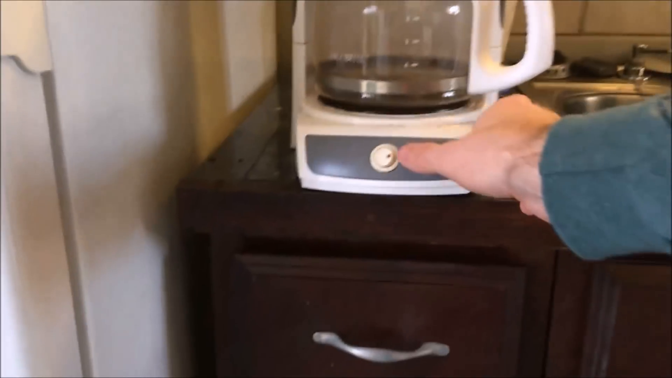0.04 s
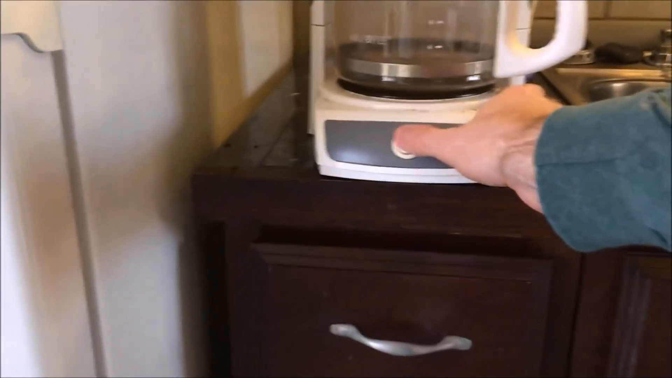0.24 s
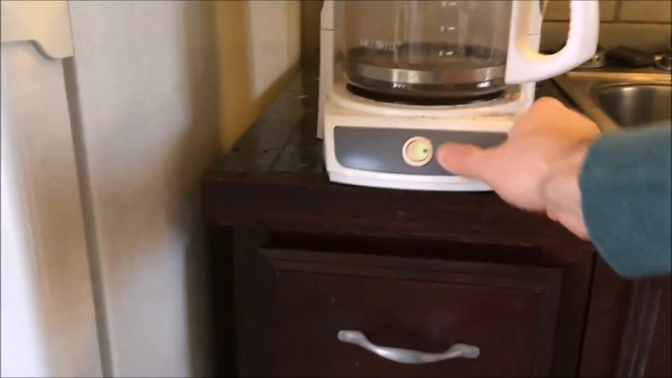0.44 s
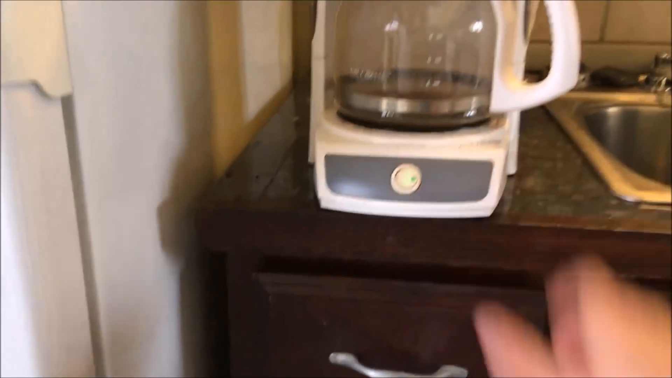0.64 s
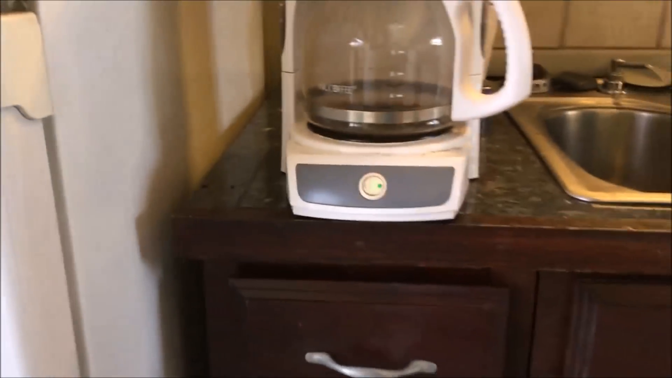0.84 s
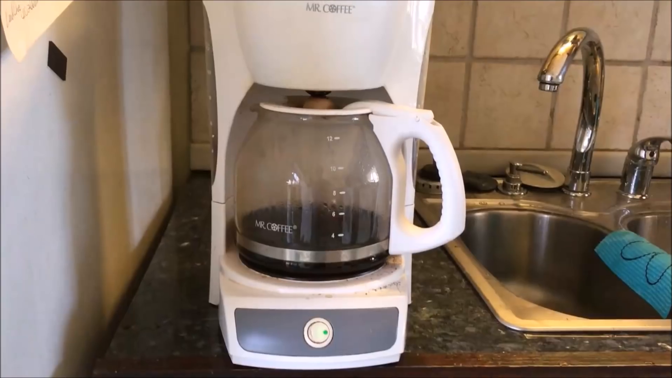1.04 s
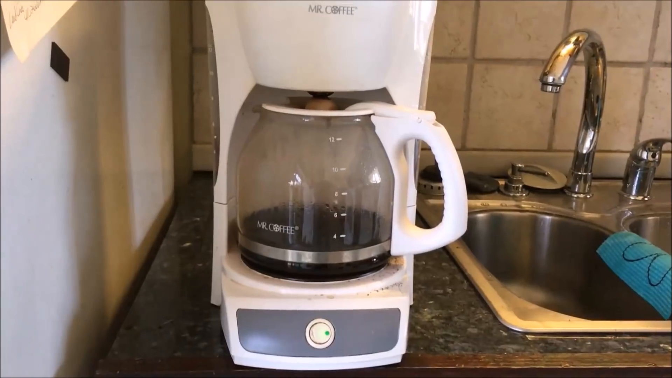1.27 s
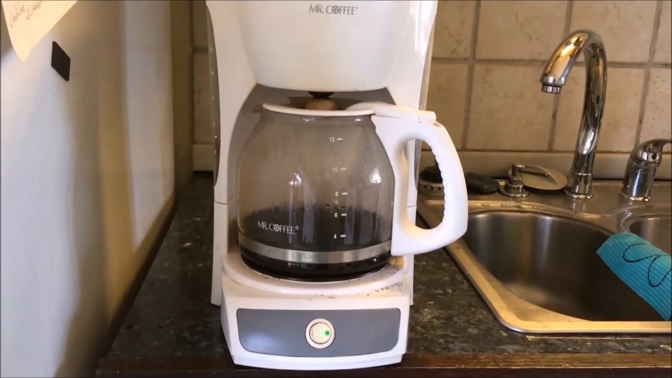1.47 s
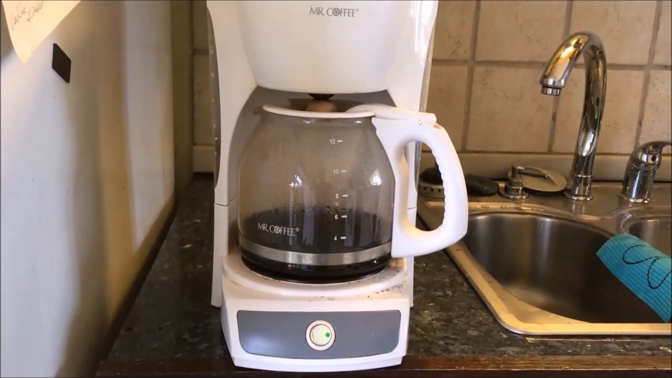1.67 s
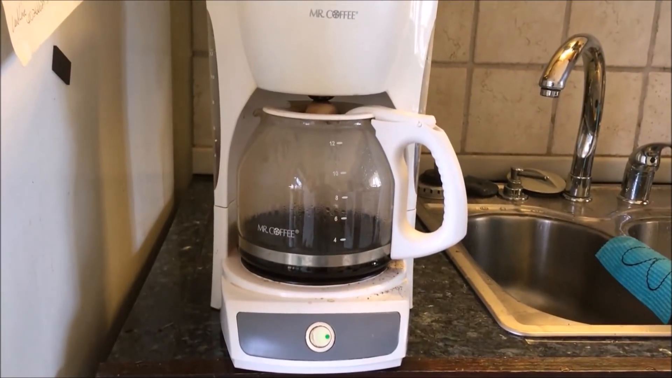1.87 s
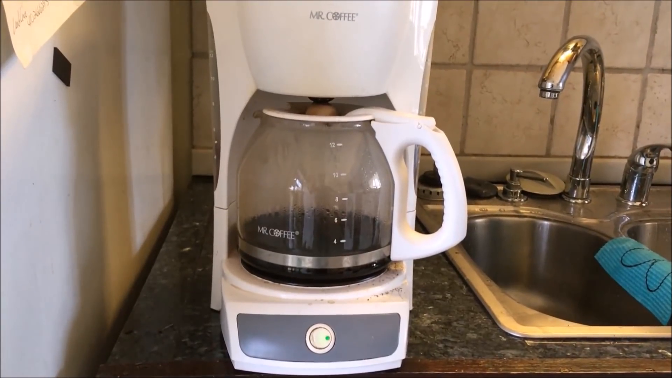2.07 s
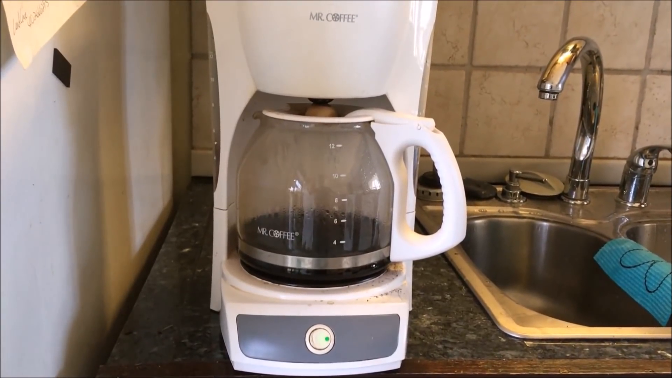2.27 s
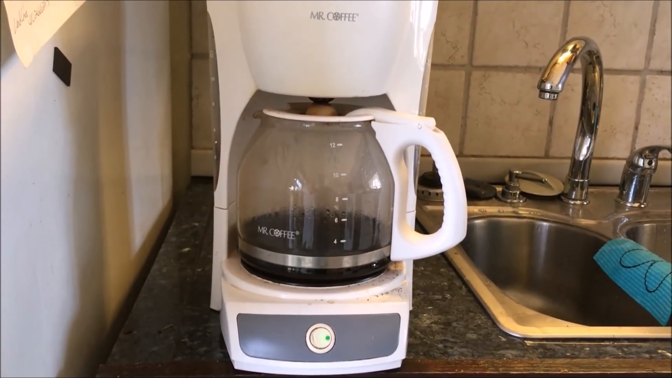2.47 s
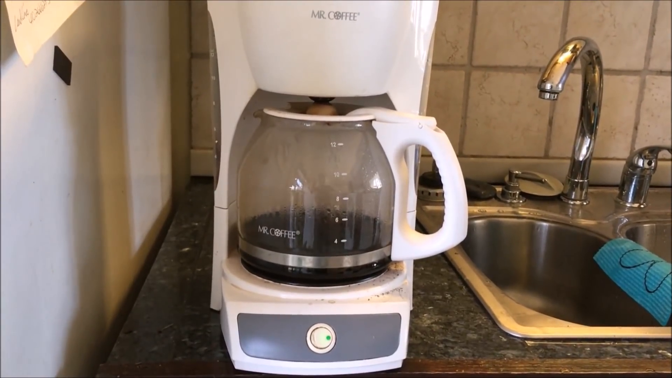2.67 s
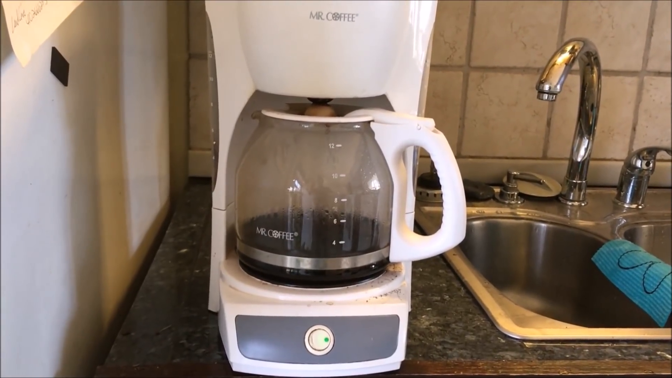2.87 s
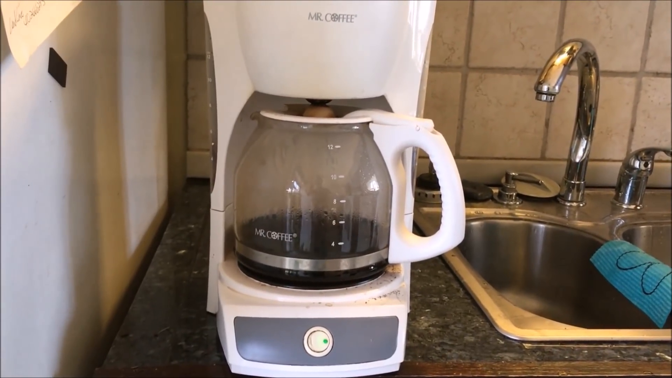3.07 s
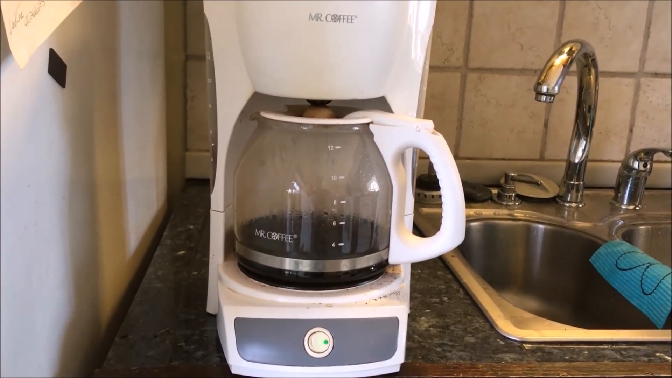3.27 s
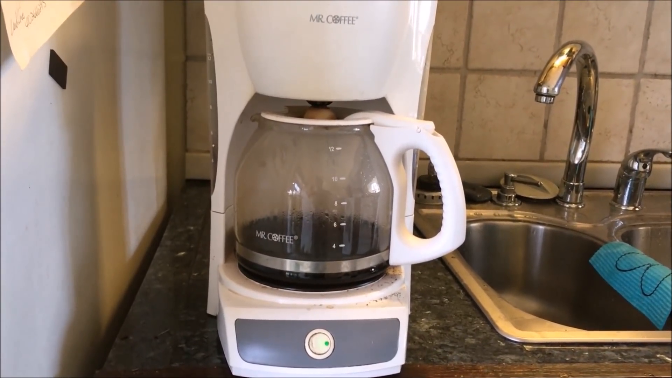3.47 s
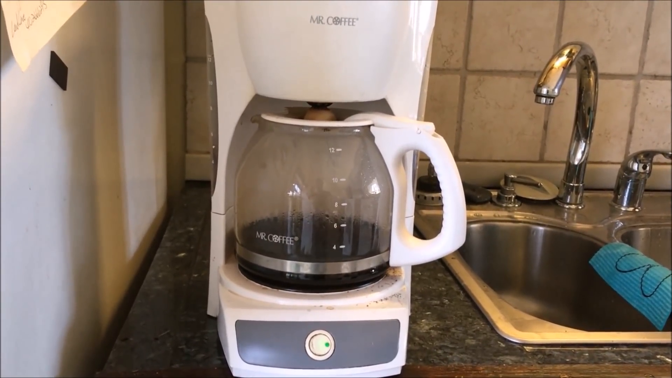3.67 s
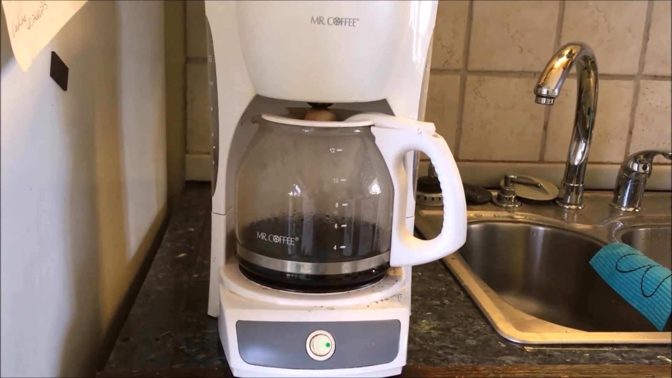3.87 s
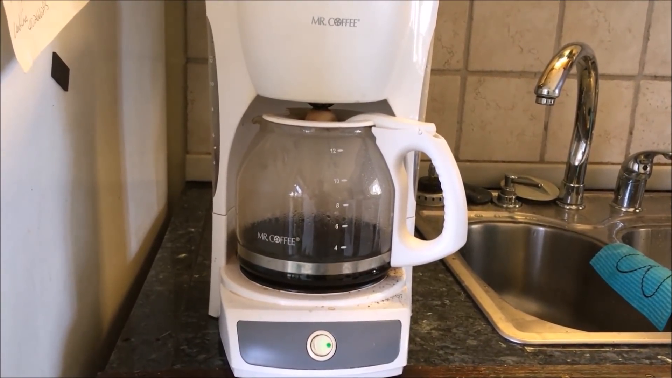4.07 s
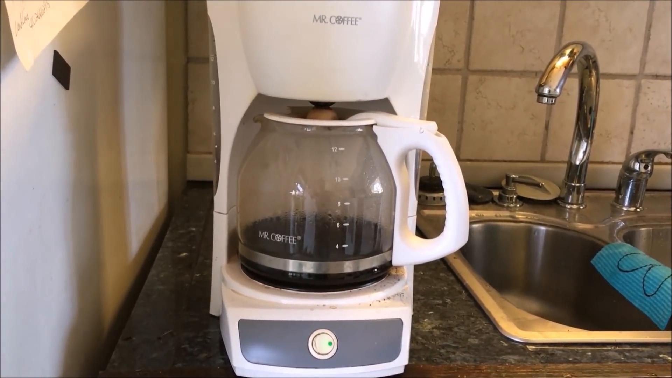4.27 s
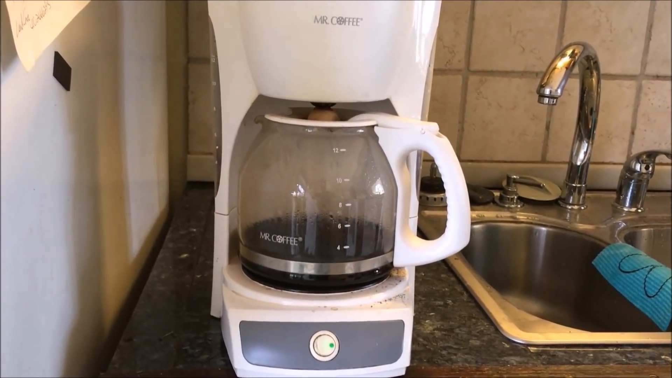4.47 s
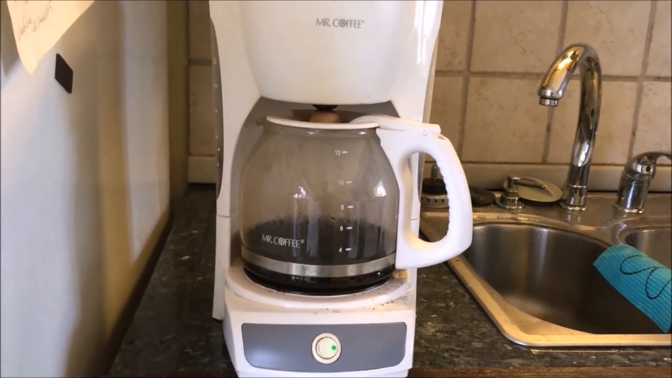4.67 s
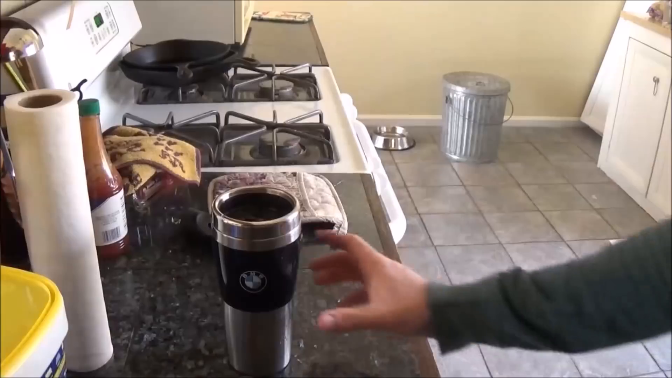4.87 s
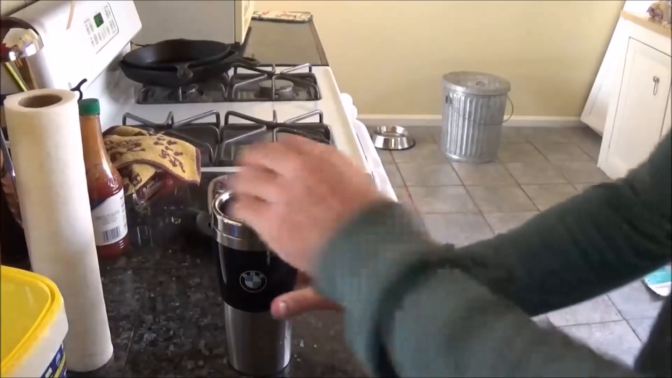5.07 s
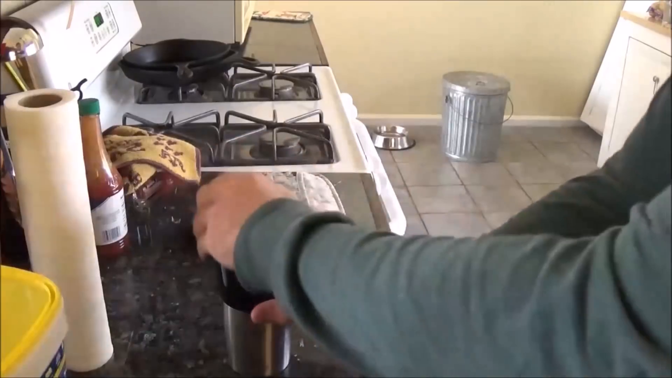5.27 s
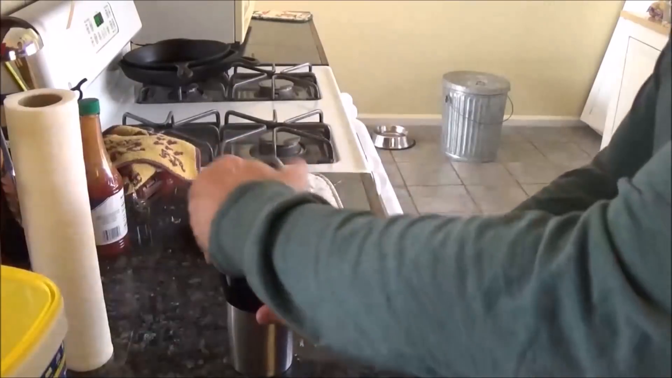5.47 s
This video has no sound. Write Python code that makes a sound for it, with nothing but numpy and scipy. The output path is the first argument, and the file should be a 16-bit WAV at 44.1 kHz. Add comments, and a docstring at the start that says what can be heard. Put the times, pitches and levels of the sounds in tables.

```python
"""A sleeve rustles in a quiet kitchen; a thumb lands on a drip coffee maker and snaps its switch.
The contacts rattle and ring the housing, and the machine rocks to rest in damped knocks.
It brews: steam slugs ring the riser tube, drops trap bubbles and ring the carafe, spits tick
and puffs hiss, over a simmer of small bubbles and fizz. The sound drops out briefly, returns
duller, and the brew has ended: cloth brushes past and a mug lid scrapes, both as dense clicks."""
import sys
import numpy as np
from scipy import signal
from scipy.fft import rfft, irfft
from scipy.io import wavfile
from scipy.ndimage import uniform_filter1d

SR = 44100
rng = np.random.default_rng(int(sys.argv[2]) if len(sys.argv) > 2 else 0)


def store_wav(level_fs):
    """Save 16-bit WAV to argv[1]."""
    pcm = np.round(np.clip(np.atleast_2d(level_fs), -1, 1) * 32767)
    wavfile.write(sys.argv[1], SR, pcm.T.astype(np.int16))


N = 243197
TIME_S = np.arange(N) / SR
AGE_S = np.arange(SR // 7) / SR  # time since a blow

# room decay: (frequency [Hz], t60 [s])
ROOM_T60 = [(100, 0.36), (300, 0.34), (1000, 0.48), (3000, 0.48), (6000, 0.34), (10000, 0.19),
            (16000, 0.35)]
# dropout, then the band limits
PAUSE_START_S, PAUSE_END_S = 4.892, 4.95
EDGE_HZ, LATE_EDGE_HZ = 16100, 11200

# quiet kitchen spectrum: (frequency [Hz], relative level [dB])
QUIET_TONE = [(15, -42), (28, -18.5), (50, 0.5), (75, 0.5), (140, -13), (200, -10.5), (300, -20),
              (1000, -26.5), (2000, -30), (4900, -34.5), (10000, -34), (14500, -29.5), (16000, -36)]
# arm reaching out and drawing back: (time [s], half length [s], rumble [dB], hiss [dB])
REACHES = [(0.019, 0.23, -57.5, -67), (0.698, 0.16, -49.5, -61)]
# before and after the pause
RUMBLE_DB, HISS_DB, LATE_RUMBLE_DB, LATE_HISS_DB = -57, -68, -65.5, -62

# simmering water: (frequency [Hz], relative level [dB])
SIMMER_TONE = [(180, -16), (300, 11), (600, 3), (1150, -1), (1500, 2.5), (1850, -3), (2100, -2),
               (2500, -9.5), (3100, -5.5), (4000, -7), (6700, -13.5), (8800, -7.5), (12000, -36)]
BREW_START_S, BREW_END_S = 0.93, 4.89
SIMMER_GAIN_DB, SIMMER_WANDER_RMS_DB = -62, 2

# sleeve cloth: (frequency [Hz], relative level [dB])
SLEEVE_TONE = [(80, -9), (200, 1.5), (550, -4), (1200, -3), (2800, -5), (5000, -5.5), (9400, -6.5),
               (11000, -12.5)]
# brush of the sleeve: (frequency [Hz], relative level [dB])
BRUSH_TONE = [(1500, -20), (2400, -1), (2900, 6.5), (3600, -16), (5500, -2), (8000, -31)]
# scraping lid: (frequency [Hz], relative level [dB])
LID_TONE = [(180, -33), (300, -6), (730, -20), (1330, -6.5), (2550, -15), (3340, -6), (4450, -9), (5420, 0),
            (6490, -8), (8770, -5), (11000, -20), (14300, -43), (22000, -120)]
# the sleeve rustles softly, then louder as the arm crosses
SLEEVE_DB, CROSS_S, CROSS_RISE_S, CROSS_DB = -59.5, 5.3, 0.046, -55.5
BRUSH_S, BRUSH_RISE_S, BRUSH_DB, BRUSH_T60_S = 5.03, .02, -51.5, 0.49
# the lid catches, then bites harder
LID_S, LID_RISE_S, LID_DB, LID_SWELL_DB_PER_S = 5.482, .01, -42, 390

# steam puffs: (mid time [s], level before fades [dB], half length [s], centre pitch [Hz])
PUFFS = [(1.908, -55.5, 0.067, 2930), (2.444, -62.5, 0.081, 2730), (2.791, -58, 0.041, 3340),
         (2.976, -54, 0.019, 3250), (3.699, -63.5, 0.13, 2640), (3.92, -68, 0.11, 3350),
         (4.3, -68, 0.08, 5750), (4.739, -55.5, 0.026, 4900)]
# puff spectrum: (multiple of the centre pitch, relative level [dB])
PUFF_TONE = [(.25, -18), (.67, -8), (1, 0), (1.3, -6), (2, -22)]

# spits on the hot plate: (time [s], level [dB])
SPITS = [(.3716, -44), (1.2735, -53), (1.3129, -52), (1.6357, -49), (1.8083, -41.5), (2.3436, -52),
         (2.5092, -46), (2.5755, -51), (2.7117, -51), (3.677, -40), (4.1964, -43), (4.6314, -50.5)]
# spit spectrum: (frequency [Hz], relative level [dB])
SPIT_TONE = [(1500, -12.5), (4000, -3), (8000, -7.5), (12000, 1.5), (16000, -6.5)]

# drops into standing water: (time [s], level [dB], bubble pitch [Hz])
PLOPS = [(1.048, -49.5, 1210), (1.087, -40.5, 1180), (1.1, -39, 1160), (1.18, -39, 960),
         (1.217, -46.5, 1540), (1.422, -42, 1076), (1.53, -46, 1540), (1.576, -48.5, 1395),
         (1.715, -38, 870), (1.749, -27, 1195), (2.276, -45.5, 1146), (2.331, -40.5, 937),
         (2.411, -46, 890), (2.494, -37.5, 1196), (2.556, -39.5, 1280), (2.748, -34.5, 1040),
         (3.682, -46.5, 893), (4.023, -35.5, 1187), (4.142, -38, 1184), (4.481, -45.5, 1690),
         (4.53, -41.5, 1430), (4.65, -48.5, 874), (4.719, -49, 1126), (4.809, -43, 1500)]
# drips on the carafe: (time [s], ring [dB], spatter [dB])
DRIPS = [(0.997, -40.5, -52), (1.111, -56, -48.5), (1.267, -52.5, -51.5), (1.313, -38, -51.5),
         (1.424, -58, -52), (1.635, -45.5, -55.5), (1.692, -39.5, -51), (2.088, -45, -71),
         (2.711, -50, -40), (2.954, -47, -54), (3.015, -60, -48), (3.262, -50, -46), (3.457, -51, -59.5),
         (3.964, -39, -50), (4.067, -40, -55), (4.142, -52, -74), (4.195, -46, -46), (4.206, -40.5, -45.5),
         (4.27, -50.5, -57), (4.352, -35.5, -44), (4.434, -48, -70), (4.462, -50, -46.5)]
# glass carafe modes: (frequency [Hz], relative level [dB], t60 [s])
CARAFE = [(2082, 5, 0.081), (2140, 4.5, 0.026), (2260, -5, 0.091), (3110, -8, 0.095), (3360, -13, 0.055),
          (3934, -5.5, .025)]
# spatter spectrum: (frequency [Hz], relative level [dB])
SPATTER_TONE = [(300, 5.5), (900, 7), (1800, 4), (2500, 4), (3150, 23.5), (4000, 5.5), (5500, -7),
                (8000, -15), (16000, -3.5)]
# tiniest bubbles in a spatter: (frequency [Hz], relative level [dB], t60 [s])
TINKLE = [(3030, -0.5, 0.027), (3220, -2, 0.0068), (3846, 1, 0.022), (5480, -4, 0.025)]
PLOP_RING_REL_DB, PLOP_SPATTER_DB = -16.5, -56.5  # ring follows the plop; spatter level is common
DRIP_PLOP_REL_DB, DRIP_HZ = -9.5, 1174  # bubble of a drip, relative to its ring
# faint trickle: spacing, lowest level, lowest pitch, pitch span
TRICKLE_GAP_S, TRICKLE_MIN_DB, TRICKLE_MIN_HZ, TRICKLE_OCTAVES = .11, -52.5, 904, 1.073

# thumb on the housing: (time [s], thud [dB], pitch [Hz], plastic knock [dB])
BUMPS = [(0.348, -55, 193, -41), (0.371, -50.5, 161, -44), (0.429, -47.5, 99, -51)]
# plastic knock spectrum: (frequency [Hz], relative level [dB])
KNOCK_TONE = [(100, -9.5), (330, 5), (550, 0), (850, -3.5), (1500, -6.5), (3000, -23), (8000, -42)]
# rocking to rest: each gap is the last times ROCK_SHRINK, each knock weaker by ROCK_FADE_DB
ROCK_START_S, ROCK_GAP_S, ROCK_SHRINK = .477, .118, .86
ROCK_FIRST_DB, ROCK_HZ, ROCK_FIRST_KNOCK_DB, ROCK_FADE_DB = -38.5, 230.5, -43, -3.5
COUNTER_DB, COUNTER_HZ = -43.5, 85.7  # the counter thuds after every rock but the first

# big steam slugs: (time [s], level [dB], tube pitch [Hz], overtones over the fundamental [dB])
GULPS = [(1.973, -37, 214, -12), (1.987, -39, 179, 1), (2.106, -34.5, 200, -4), (2.119, -29.5, 185, -5),
         (2.187, -34, 179, -3), (2.585, -27.5, 196, -2.5), (2.619, -28, 200, -12), (2.662, -25.5, 192, -4),
         (2.682, -37, 203, 6), (2.701, -30, 189, -2), (2.745, -33.5, 209, 0), (2.761, -26, 209.6, -6.5),
         (2.778, -26.5, 202, -9), (2.816, -27, 202, -11), (2.843, -28.5, 201, -12), (2.854, -33, 235, 5.5),
         (2.876, -36, 201, 3), (2.91, -31, 194, -2), (2.924, -41, 214, 5), (2.948, -29.5, 174, 1),
         (2.959, -28, 214, -1), (3.018, -42, 243, 9), (3.084, -37, 195, -12), (3.128, -27, 201, -4),
         (3.157, -33.5, 193, -8), (3.183, -32.5, 215, -3.5), (3.252, -34, 197, 0), (3.31, -30, 205, -9.5),
         (3.384, -42.5, 233, 2.5), (3.415, -51, 217, 11.5), (3.722, -37.5, 205, -6),
         (3.733, -36, 192, -1.5), (3.854, -31, 209, 0.5), (3.863, -38.5, 203, 7), (3.882, -31.5, 171, 0),
         (3.899, -31.5, 225, 2), (3.924, -36, 221, 0), (3.968, -38.5, 186, 2), (4.063, -33.5, 206, 3),
         (4.087, -31.5, 210, -8)]
# bouts of small slugs: (start [s], end [s], mean level [dB])
BOUTS = [(2.13, 2.27, -42), (2.52, 3.11, -41), (3.19, 3.37, -41.5), (4.08, 4.13, -40)]
# riser tube overtones: (frequency [Hz], relative level [dB], t60 [s])
TUBE_HIGH = [(617, 0, 0.072), (569, 4.5, 0.049), (504, -20, 0.026), (361, -3.5, 0.093), (318, -0.5, 0.092),
             (758, -5.5, 0.039)]
# high tube modes rung by the splash: (frequency [Hz], relative level [dB], t60 [s])
TUBE_TOP = [(1008.3, -8, 0.13), (947, 2, 0.011), (1170, -11.5, 0.049), (1415, -17, .04), (1660, -19, 0.099)]
# splash spectrum: (frequency [Hz], relative level [dB])
SPLASH_TONE = [(200, -24.5), (400, 19.5), (900, 4.5), (1500, 2), (2200, -8.5), (3300, -2), (4200, -11),
               (5500, -14.5), (9000, -27), (16000, -25)]
# the lowest mode swells over about a cycle and dies fast
TUBE_RISE_S, TUBE_T60_S = 0.0068, .066
SPLASH_REL_DB = -8.5  # relative to the overtones
SMALL_GAP_S, SMALL_MEAN_HZ, SMALL_MEAN_SHARP_DB = .04, 205.8, -9
# churned bubbles: lowest pitch, span, level at lowest pitch relative to the overtones, latest start
CHURN_MIN_HZ, CHURN_OCTAVES, CHURN_MAX_REL_DB, CHURN_MAX_S = 514, 1.9, -11, .04
BUBBLE_CYCLES, BUBBLE_GLIDE = 5.6, 0.069  # cycles to fade by a neper, pitch rise in that time
# droplets: top level at unit force, exponent on the slug's force, longest flight
SPUTTER_MAX_DB, SPUTTER_SHARE, SPUTTER_MAX_S = -31, 0.65, .045

# switch contacts: (time [s], level [dB], rattle time [s])
SWITCH = [(0.4704, -26.5, 0.0044), (.4730, 0.5, 0.0031), (0.4733, -9, 0.0098)]
# snap spectrum: (frequency [Hz], relative level [dB])
SNAP_TONE = [(120, -47.5), (220, -25), (800, -23), (1050, -19), (1450, 1), (2000, -7), (2800, -2),
             (4000, -9.5), (5800, -8), (7100, -7.5), (8000, -15.5), (9400, -3.5), (12800, -6.5),
             (16000, -10)]
# plastic housing modes: (frequency [Hz], relative level [dB], t60 [s])
CASE = [(222, -7, 0.12), (853, -7, 0.07), (1435, -7, 0.05), (1994, 3.5, 0.059), (2500, 3.5, 0.071),
        (2860, -3, 0.096), (3300, -13.5, .06), (4900, -9.5, .05)]


def gain_of(db):
    """Decibels to amplitude."""
    return 10 ** (np.asarray(db) / 20)


def evened(x):
    """Scales to rms 1."""
    return x / np.sqrt(np.mean(x ** 2) + 1e-20)


def peaked(x):
    """Scales to peak 1."""
    return x / (abs(x).max() + 1e-20)


def read(points, hz):
    """Reads a spectrum on a log-frequency axis."""
    point_hz, value = np.transpose(points)
    return np.interp(np.log(hz + 1), np.log(point_hz + 1), value)


def ramp(start_s, rise_s):
    """Goes linearly from 0 to 1, starting at start_s."""
    return np.clip((TIME_S - start_s) / rise_s, 0, 1)


def add(mix, start_s, sound):
    """Mixes a sound in at start_s."""
    part = mix[round(start_s * SR):][:len(sound)]
    part += sound[:len(part)]


def colour(x, spectrum, size=4096):
    """Causal minimum-phase filter with the given spectrum."""
    log_gain = np.log(gain_of(read(spectrum, abs(np.fft.fftfreq(size, 1 / SR)))))
    taps = np.fft.ifft(np.exp(np.conj(signal.hilbert(log_gain)))).real
    return signal.oaconvolve(x, taps[:size // 2])[:len(x)]


def low_pass(x, hz):
    """Steep linear-phase band limit."""
    taps = signal.firwin(511, hz, window=("kaiser", 9), fs=SR)
    return signal.oaconvolve(x, taps, "same")


def ring(modes, rise_s, scatter):
    """Decaying sine modes, peak 1, each a little off pitch from blow to blow."""
    out = np.zeros(len(AGE_S))
    for hz, db, t60_s in modes:
        blow_hz = hz * (1 + scatter * rng.standard_normal())
        out += gain_of(db - 60 * AGE_S / t60_s) * np.sin(2 * np.pi * blow_hz * AGE_S)
    return peaked(out * (1 - np.exp(-AGE_S / rise_s)))


def burst(spectrum, rise_s, t60_s):
    """A decaying puff of coloured noise, peak 1."""
    shape = (1 - np.exp(-AGE_S / rise_s)) * gain_of(-60 * AGE_S / t60_s)
    return peaked(colour(rng.standard_normal(len(AGE_S)) * shape, spectrum))


def grains(spectrum, per_s, spread_db):
    """Random tiny clicks of uneven size and sign, coloured, rms 1."""
    size = gain_of(spread_db * np.minimum(rng.exponential(1, N), 4))
    sign = np.sign(rng.random(N) - .5)
    hit = rng.random(N) < per_s / SR
    return evened(colour(size * sign * hit, spectrum))


def bubble(hz):
    """A free bubble: its pitch rises as it nears the surface, and small ones die sooner."""
    turns = hz * AGE_S[:len(AGE_S) // 3]
    life = turns / BUBBLE_CYCLES
    tone = np.sin(2 * np.pi * turns * (1 + BUBBLE_GLIDE * life / 2))
    return tone * np.exp(-life) * (1 - np.exp(-2 * turns))


def thud(hz):
    """A dull, quickly damped knock of two modes."""
    return ring([(hz, 0, .12), (hz * 1.3, -7, .07)], rise_s=.002, scatter=.01)


def kitchen(x, near_db, wet_db, near_t60_s=0.024):
    """Adds quick echoes from counter and tiles, then the room's frequency-dependent tail."""
    t = np.arange(SR // 2) / SR
    sign = rng.choice([-1, 1], (2, len(t)))
    hit = rng.random((2, len(t))) < 3000 / SR
    near, far = sign * hit * (t > .0015)
    near = near * gain_of(-60 * t / near_t60_s)
    hz, age_s, bins = signal.stft(far * (t > .006), SR, nperseg=256)
    decay = gain_of(-60 * age_s / read(ROOM_T60, hz)[:, None])
    far = signal.istft(bins * decay, SR, nperseg=256)[1][:len(t)]
    echoes = gain_of(near_db) * near / np.linalg.norm(near) + gain_of(wet_db) * far / np.linalg.norm(far)
    return x + signal.oaconvolve(x, echoes)[:N]


def quiet():
    """Room noise split at 400 Hz into rumble and hiss; both swell as the arm moves."""
    air = rfft(colour(rng.standard_normal(N), QUIET_TONE))
    low = np.fft.rfftfreq(N, 1 / SR) < 400
    late = TIME_S > PAUSE_END_S
    rumble = gain_of(np.where(late, LATE_RUMBLE_DB, RUMBLE_DB))
    hiss = gain_of(np.where(late, LATE_HISS_DB, HISS_DB))
    for mid_s, half_s, rumble_db, hiss_db in REACHES:
        move = np.exp(-((TIME_S - mid_s) / half_s) ** 2 / 2)
        # powers add
        rumble = np.hypot(rumble, gain_of(rumble_db) * move)
        hiss = np.hypot(hiss, gain_of(hiss_db) * move)
    return rumble * evened(irfft(air * low, N)) + hiss * evened(irfft(air * ~low, N))


def simmer(count=500):
    """Small bubbles, each size with its own pitch, over a fine fizz; the whole swells and ebbs."""
    blips, t = np.zeros(N), AGE_S[:len(AGE_S) // 4]
    for when, size, strength in rng.random((count, 3)):
        hz = 750 * 5.5 ** size
        blip = np.sin(2 * np.pi * hz * t) * np.exp(-hz * t / 6.9)  # small bubbles die sooner
        level_db = read(SIMMER_TONE, hz) + 10 * strength ** 2
        add(blips, when * TIME_S[-1], gain_of(level_db) * blip)
    fizz = grains(SIMMER_TONE, per_s=900, spread_db=3.5)
    mix = gain_of(-6) * evened(blips) + gain_of(-3) * fizz
    rates_hz = np.geomspace(1, 6, 10)
    swell = evened(sum(np.sin(2 * np.pi * (rate_hz * TIME_S + rng.random())) for rate_hz in rates_hz))
    brewing = ramp(BREW_START_S, .02) - ramp(BREW_END_S, .02)
    level = gain_of(SIMMER_GAIN_DB + SIMMER_WANDER_RMS_DB * swell)
    return kitchen(mix * brewing * level, near_db=-4.5, wet_db=-8.5)


def mug():
    """Friction as dense clicks: cloth brushes past, then the lid scrapes on the rim."""
    arm = gain_of(SLEEVE_DB) * ramp(PAUSE_END_S, rise_s=0.11)
    arm += gain_of(CROSS_DB) * ramp(CROSS_S - CROSS_RISE_S / 2, CROSS_RISE_S)
    brush_age_s = np.maximum(TIME_S - BRUSH_S - BRUSH_RISE_S, 0)
    stroke = ramp(BRUSH_S, BRUSH_RISE_S) * gain_of(BRUSH_DB - 60 * brush_age_s / BRUSH_T60_S)
    lid_age_s = np.maximum(TIME_S - LID_S, 0)
    bite = ramp(LID_S, LID_RISE_S) * gain_of(LID_DB + LID_SWELL_DB_PER_S * lid_age_s)
    sleeve = grains(SLEEVE_TONE, per_s=18000, spread_db=4.0) * arm
    brush = grains(BRUSH_TONE, per_s=8000, spread_db=1.5) * stroke
    lid = grains(LID_TONE, per_s=5000, spread_db=0.0) * bite
    return sleeve + brush + lid


def puffs():
    """Escaping steam: short crackling hisses around a centre pitch."""
    out = np.zeros(N)
    crackle = grains([(100, 0), (16000, 0)], per_s=2000, spread_db=3)
    for mid_s, db, half_s, hz in PUFFS:
        part = crackle[round((mid_s - half_s) * SR):round((mid_s + half_s) * SR)]
        tone = [(hz * multiple, tone_db) for multiple, tone_db in PUFF_TONE]
        hiss = evened(colour(part, tone))
        add(out, mid_s - half_s, gain_of(db) * hiss * np.hanning(len(part)) ** 2)
    return kitchen(out, near_db=-17.0, wet_db=-8.5)


def spits():
    """Tiny bright noise ticks of water on hot metal."""
    out = np.zeros(N)
    for start_s, db in SPITS:
        add(out, start_s, gain_of(db) * burst(SPIT_TONE, rise_s=0.00015, t60_s=0.04))
    return kitchen(out, near_db=-1, wet_db=-10, near_t60_s=.03)


def drop(plop_db, hz, ring_db, spatter_db, count=3):
    """A drop spatters, traps a short-lived bubble, rings the carafe and throws off droplets."""
    trapped = [(hz, 0, .028), (hz * 1.186, -6, .016), (hz * 0.798, -8, .016)]
    out = gain_of(plop_db) * ring(trapped, rise_s=0.00073, scatter=0.029)
    out += gain_of(ring_db) * ring(CARAFE, rise_s=0.00081, scatter=0.006)
    tinkle = ring(TINKLE, rise_s=.001, scatter=.045)
    spatter = burst(SPATTER_TONE, rise_s=0.00053, t60_s=0.039)
    out += gain_of(spatter_db) * (tinkle + gain_of(5) * spatter)
    for delay, pitch in rng.random((count, 2)):
        droplet = gain_of(spatter_db - 4.0) * bubble(1100 + 2600 * pitch)
        add(out, 0.0054 + .035 * delay, droplet)
    return out


def drops():
    """Plops in the water, drips on the glass, and a faint random trickle between them."""
    out = np.zeros(N)
    for start_s, db, hz in PLOPS:
        add(out, start_s, drop(db, hz, db + PLOP_RING_REL_DB, PLOP_SPATTER_DB))
    for start_s, db, spatter_db in DRIPS:
        add(out, start_s, drop(db + DRIP_PLOP_REL_DB, DRIP_HZ, db, spatter_db))
    times_s = np.arange(BREW_START_S, BREW_END_S, TRICKLE_GAP_S)[1:-1]
    for start_s, (late, loud, size) in zip(times_s, rng.random((len(times_s), 3))):
        db = TRICKLE_MIN_DB + 5 * loud
        hz = TRICKLE_MIN_HZ * 2 ** (TRICKLE_OCTAVES * size)
        add(out, start_s + TRICKLE_GAP_S * late, drop(db, hz, ring_db=db - 6.5, spatter_db=db - 9.5))
    return kitchen(out, near_db=-5.0, wet_db=-10.5, near_t60_s=0.061)


def small_gulps():
    """Weak slugs at uneven intervals through each bout, as rows like the big ones."""
    rows = []
    for bout_s, end_s, db in BOUTS:
        chance = rng.uniform(-1, 1, (40, 4))
        for slot_s, (late, loud, pitch, sharp) in zip(np.arange(bout_s, end_s, SMALL_GAP_S), chance):
            start_s = slot_s + .3 * SMALL_GAP_S * late
            hz = SMALL_MEAN_HZ * (1 + .1 * pitch)
            rows.append((start_s, db + 2.5 * loud, hz, SMALL_MEAN_SHARP_DB + 4 * sharp))
    return rows


def gulps(count=3):
    """Each slug bursts and rings the riser tube; sharp ones throw more water, bubbles and droplets."""
    boom, slosh = np.zeros((2, N))
    for start_s, db, hz, sharp_db in GULPS + small_gulps():
        lowest = ring([(hz, 0, TUBE_T60_S)], rise_s=TUBE_RISE_S, scatter=0.008)
        add(boom, start_s, gain_of(db) * lowest)
        force = gain_of(db + sharp_db)
        splash = burst(SPLASH_TONE, rise_s=0.00089, t60_s=0.072)
        splash += gain_of(-2.0) * ring(TUBE_TOP, rise_s=0.00063, scatter=0.024)
        overtones = ring(TUBE_HIGH, rise_s=0.0013, scatter=0.019)
        add(slosh, start_s, force * (overtones + gain_of(SPLASH_REL_DB) * splash))
        for delay, size, flight, pitch in rng.random((count, 4)):
            blip = bubble(CHURN_MIN_HZ * 2 ** (CHURN_OCTAVES * size))
            blip_gain = force * gain_of(CHURN_MAX_REL_DB - 13 * size)
            add(slosh, start_s + CHURN_MAX_S * delay, blip_gain * blip)
            tick = ring([(2000 + 3400 * pitch, 0, .011)], rise_s=0.00014, scatter=.02)
            tick_gain = gain_of(SPUTTER_MAX_DB - 6 * pitch) * force ** SPUTTER_SHARE
            add(slosh, start_s + SPUTTER_MAX_S * flight, tick_gain * tick)
    # a small tube radiates little bass
    boom = colour(boom, [(60, -19), (110, -1.0), (170, -2.0), (1000, -0.5)])
    boom = kitchen(boom, near_db=-25.5, wet_db=-9.5)
    return boom + kitchen(slosh, near_db=-10, wet_db=-11.5, near_t60_s=0.049)


def bumps(count=6):
    """The thumb lands on the housing; after the press the machine rocks to rest on the counter."""
    out, start_s, rocks = np.zeros(N), ROCK_START_S, []
    for k in range(count):
        fade_db = k * ROCK_FADE_DB
        rocks.append((start_s, ROCK_FIRST_DB + fade_db, ROCK_HZ, ROCK_FIRST_KNOCK_DB + fade_db))
        if k:
            counter = thud(COUNTER_HZ * (1 + 0.069 * rng.standard_normal()))
            add(out, start_s + 0.0126, gain_of(COUNTER_DB) * counter)
        start_s += ROCK_GAP_S * ROCK_SHRINK ** k
    for start_s, db, hz, knock_db in BUMPS + rocks:
        add(out, start_s, gain_of(db) * thud(hz))
        add(out, start_s, gain_of(knock_db) * burst(KNOCK_TONE, rise_s=0.0028, t60_s=0.086))
    return kitchen(out, near_db=-6.5, wet_db=-7.5)


def switch():
    """The contacts snap over, rattle for a few milliseconds and shake the housing."""
    out = np.zeros(N)
    for start_s, db, rattle_s in SWITCH:
        rattle = np.fft.rfft(rng.standard_normal(len(AGE_S)) * gain_of(-60 * AGE_S / rattle_s))
        even = np.fft.irfft(rattle / (abs(rattle) + 1e-9))  # same strength at every frequency
        snap = peaked(colour(even * np.exp(-AGE_S / rattle_s), SNAP_TONE))
        add(out, start_s, gain_of(db) * snap)
    main_snap_s = SWITCH[1][0]
    add(out, main_snap_s, gain_of(-25.5) * ring(CASE, rise_s=0.00035, scatter=0.001))
    return kitchen(out, near_db=-4.5, wet_db=-8, near_t60_s=0.046)


def scene():
    """All sources sit in the middle."""
    mono = quiet() + simmer() + mug() + puffs() + spits() + drops() + gulps() + bumps() + switch()
    return np.array([mono, mono])


def record(dry):
    """The sound drops out briefly and comes back duller; then the band limit."""
    gates = 1. * np.array([TIME_S < PAUSE_START_S, TIME_S > PAUSE_END_S])
    before, after = uniform_filter1d(gates, size=64)  # softens the edges
    return np.array([low_pass(x * before + low_pass(x, LATE_EDGE_HZ) * after, EDGE_HZ) for x in dry])


dry = scene()
out = record(dry)
store_wav(out)
```